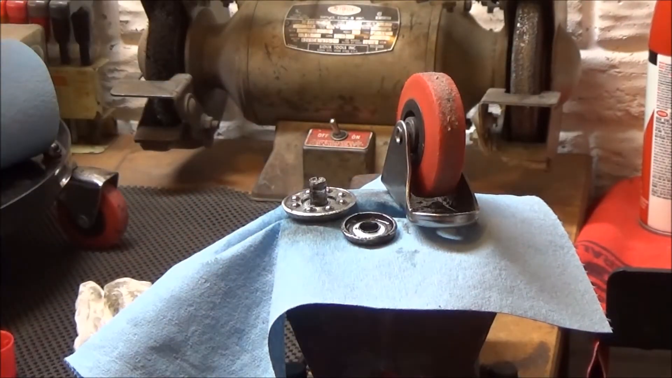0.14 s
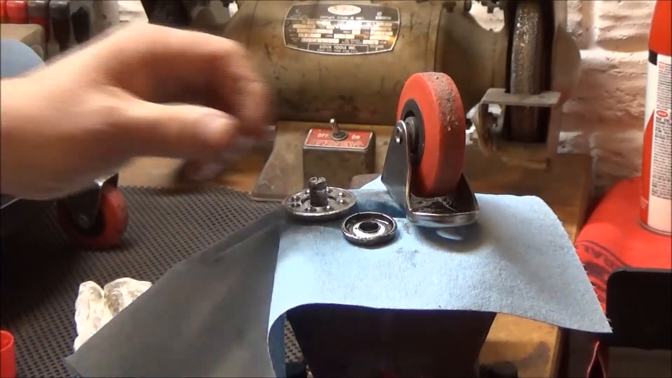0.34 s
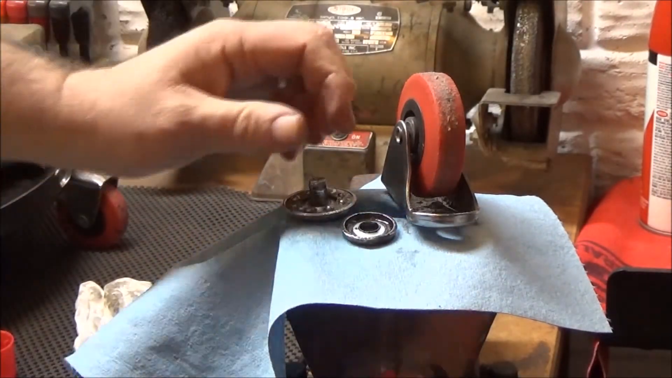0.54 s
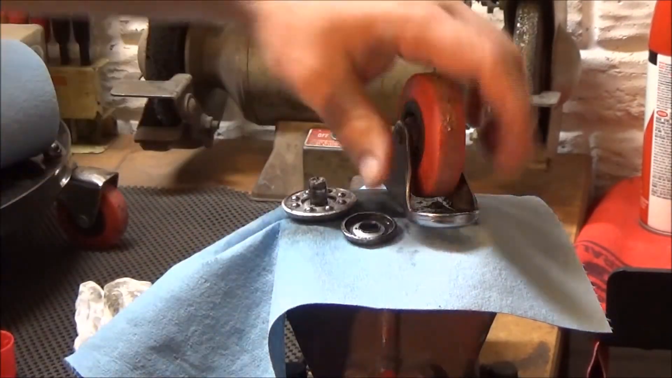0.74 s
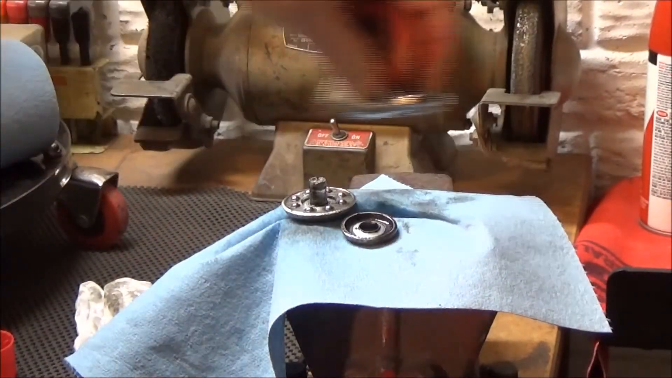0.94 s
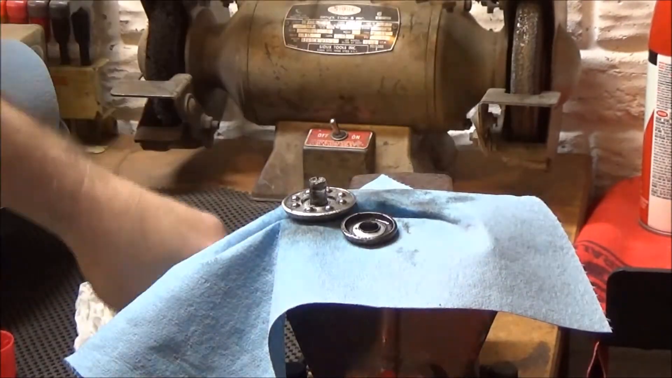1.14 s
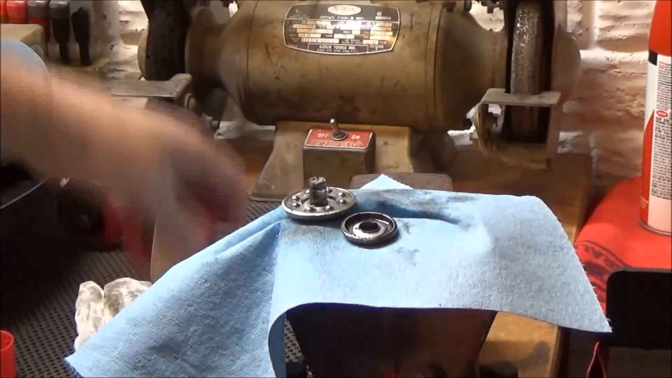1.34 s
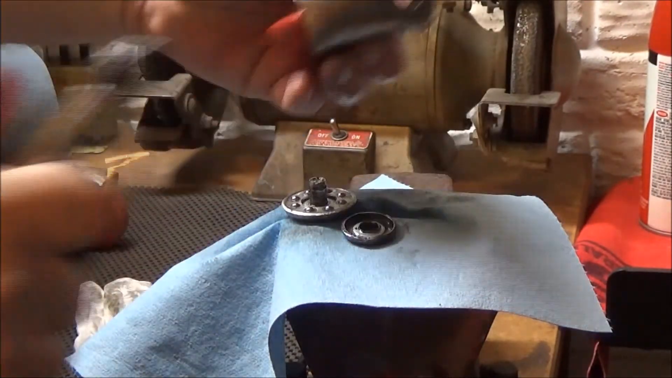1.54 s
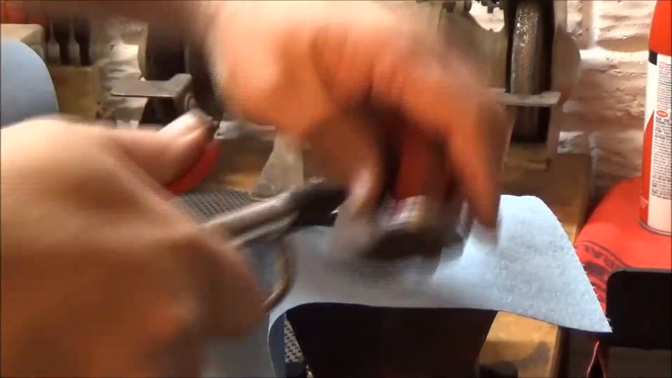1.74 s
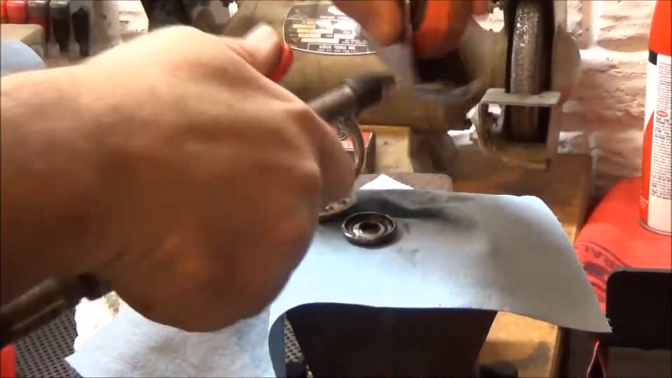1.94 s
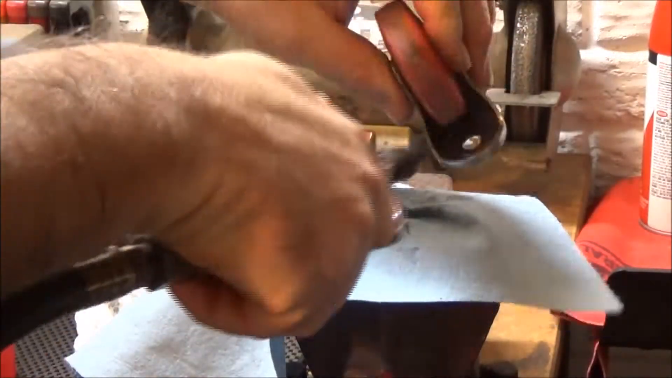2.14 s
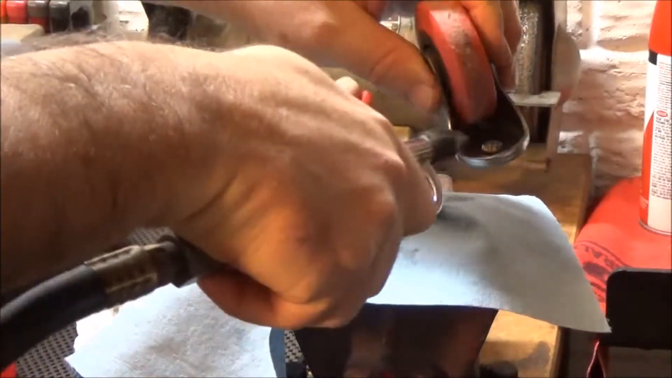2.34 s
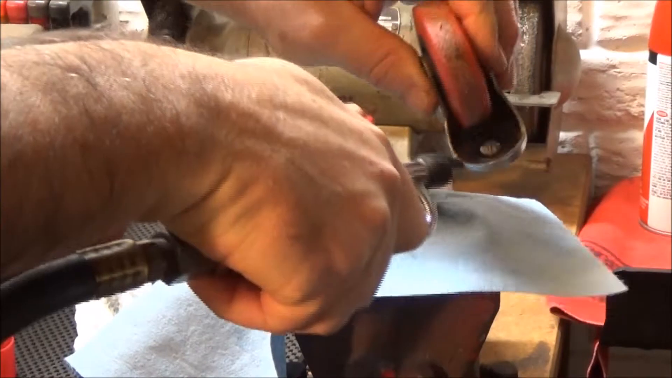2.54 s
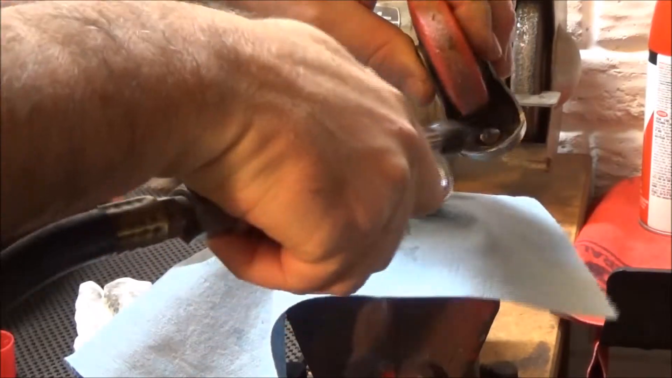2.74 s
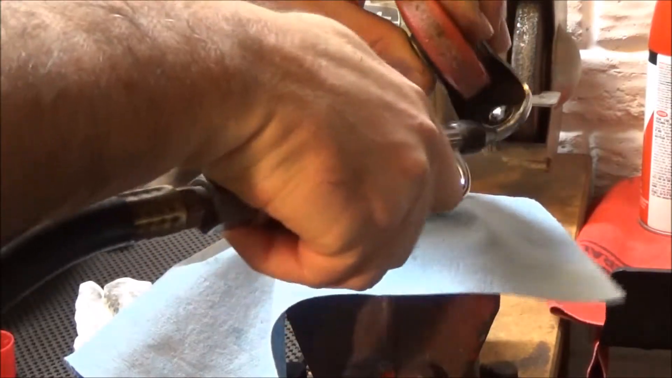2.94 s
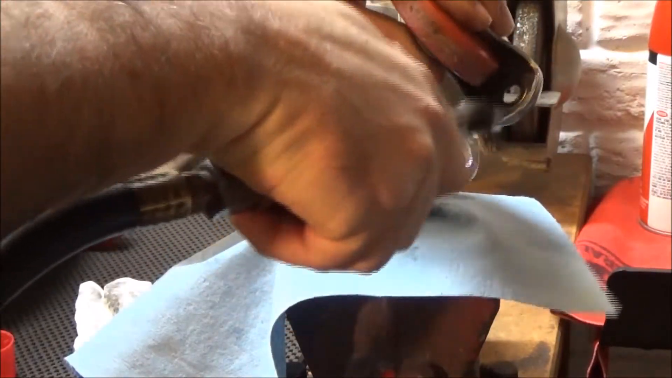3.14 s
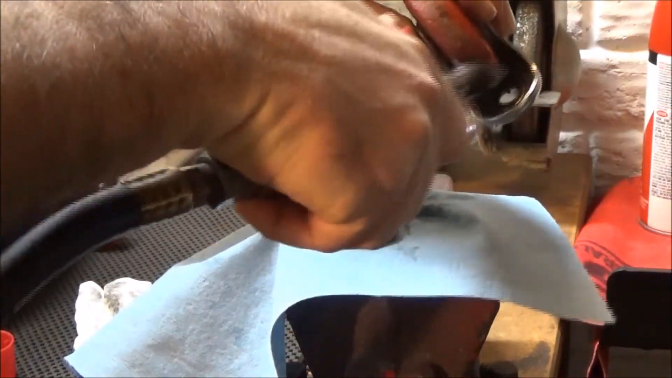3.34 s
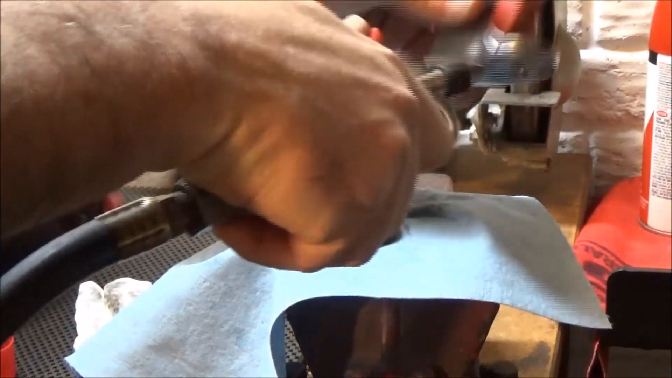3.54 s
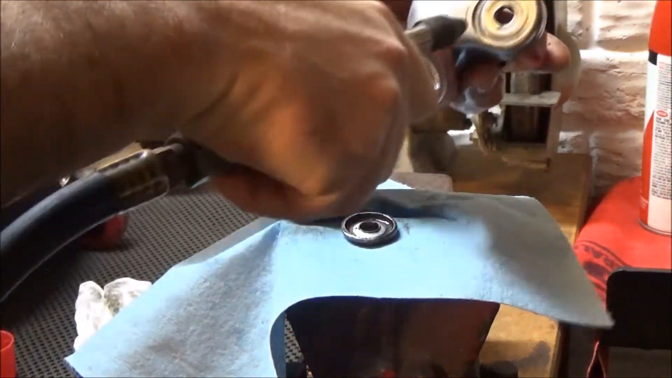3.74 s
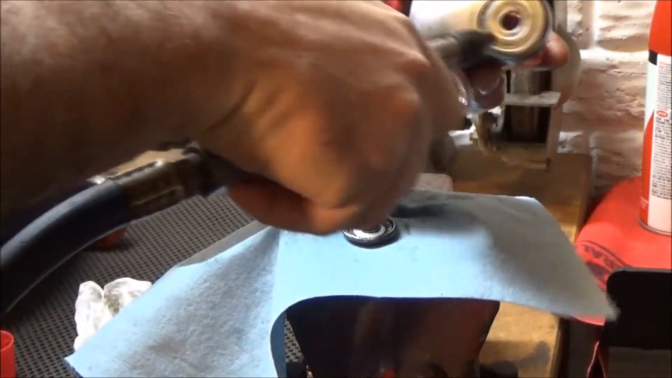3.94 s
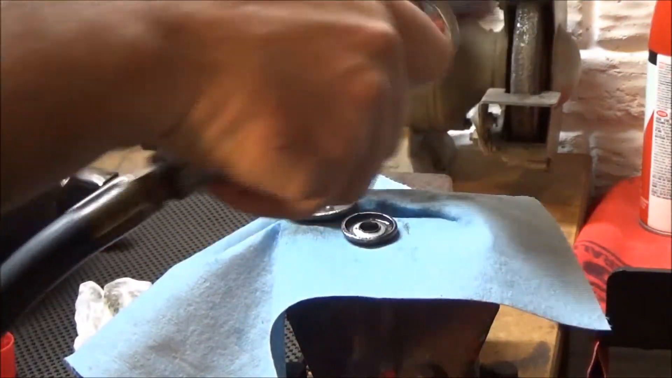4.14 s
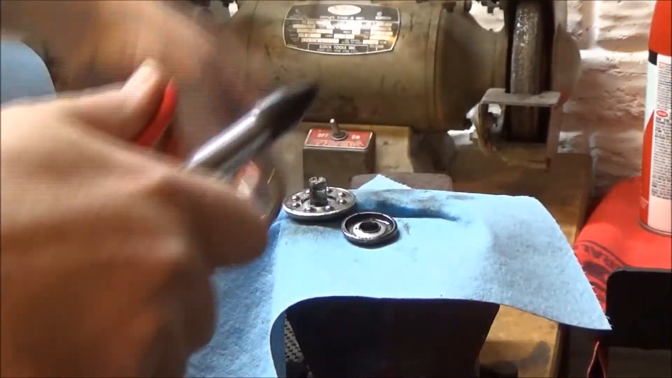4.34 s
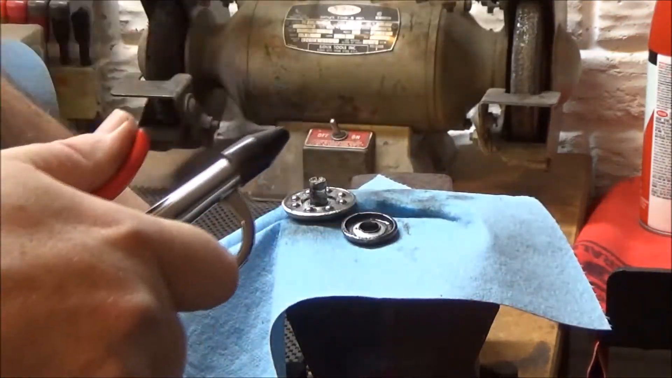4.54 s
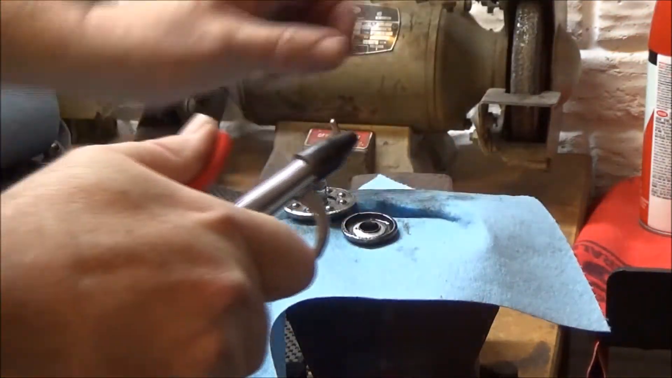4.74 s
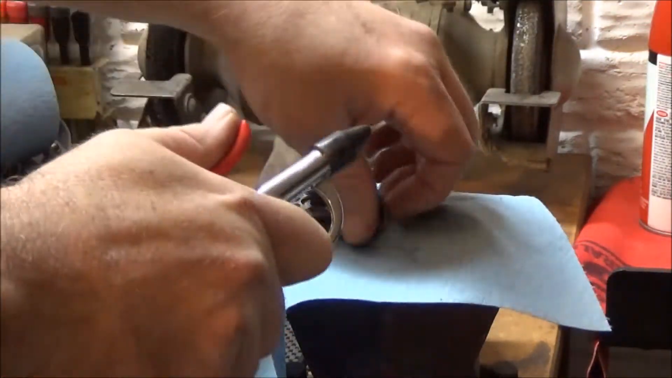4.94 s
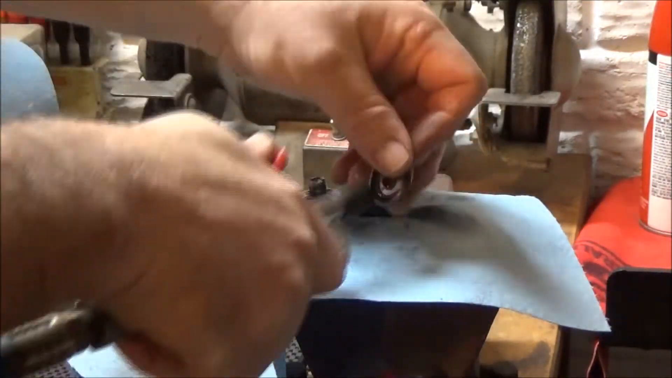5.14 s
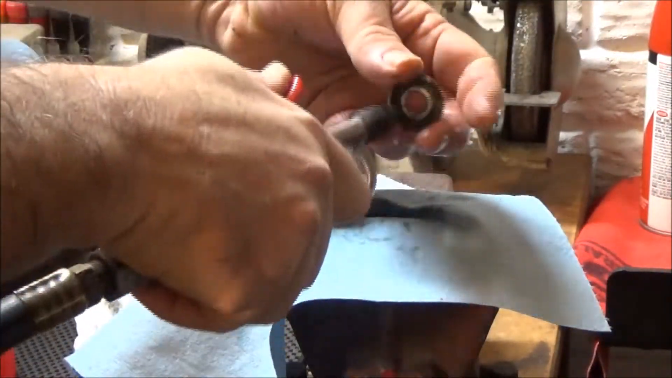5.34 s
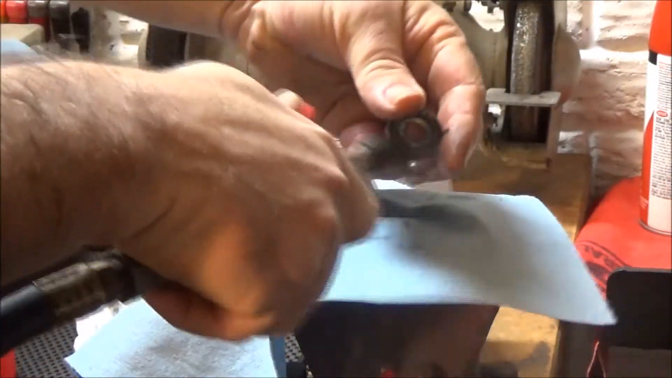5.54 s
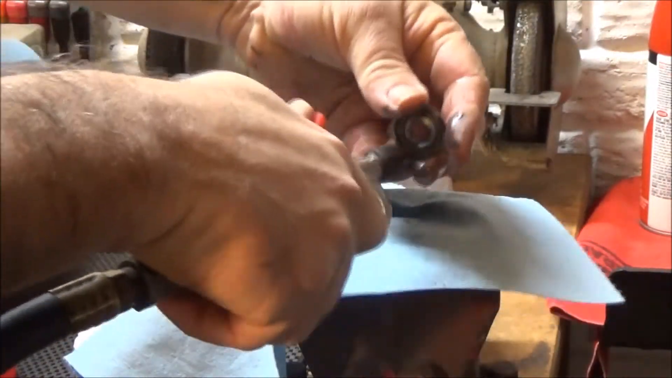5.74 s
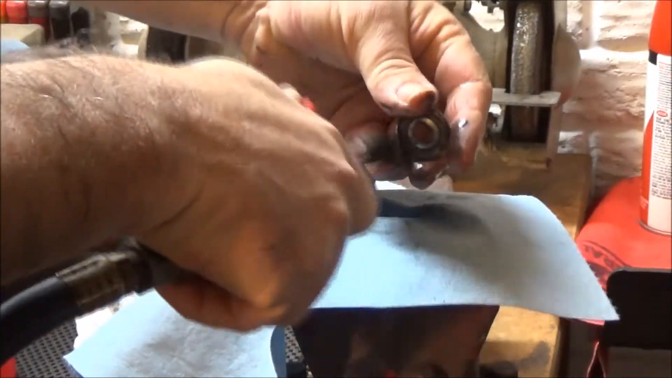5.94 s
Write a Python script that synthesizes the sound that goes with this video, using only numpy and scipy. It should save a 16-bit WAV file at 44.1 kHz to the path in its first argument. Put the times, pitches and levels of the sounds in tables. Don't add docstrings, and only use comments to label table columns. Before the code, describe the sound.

In a small workshop, a motor hums and whines, a metal tool clicks, then compressed air hisses harshly in several abrupt bursts.

```python
import sys
import numpy as np
from scipy import signal
from scipy.fft import rfft, irfft
from scipy.io import wavfile
from scipy.ndimage import uniform_filter1d

SR = 44100
rng = np.random.default_rng(int(sys.argv[2]) if len(sys.argv) > 2 else 0)


def volts_from_db(level):
    exponent = np.asarray(level, float) / 20
    return 10 ** exponent


def pcm_store(signal):
    levels = np.round(np.clip(np.atleast_2d(signal), -1, 1) * 32767)
    wavfile.write(sys.argv[1], SR, levels.astype(np.int16).T)


N = 269010

# opens_s, opening_time_s, starts_to_shut_s, shutting_time_s, nozzle_hiss_db
BLASTS = [
    (2.142, 0.0056, 2.294, 0.026, -18.5),
    (2.468, 0.073, 3.466, .012, -20),
    (3.748, 0.0084, 3.827, .014, -21),
    (3.885, 0.026, 4.096, 0.016, -21),
    (5.497, 0.017, 6.27, .01, -20.5),
]
SLOW_END_S = 0.163
RACE_FROM_S = 5
TOP_HZ = 15750


def rms_one(x):
    return x / np.sqrt(np.mean(x ** 2) + 1e-20)


def at_hz(points, hz):
    table = np.array(points)
    return np.interp(np.log(hz + 0.00087), np.log(table[:, 0]), table[:, 1])


def drift(rate):
    r = np.exp(-32 * np.pi * rate / SR)
    draws = rng.standard_normal(N // 16 + 4002)
    slow = signal.lfilter([1], [1, -2 * r, r * r], draws)[4000:]
    return np.interp(np.arange(N) / 16, np.arange(len(slow)), rms_one(slow))


def stereo_noise(spectrum, likeness):
    hz = np.fft.rfftfreq(N, 1 / SR)
    colour = volts_from_db(at_hz(spectrum, hz)) * (hz < TOP_HZ)
    mid, side = rfft(rng.standard_normal((2, N))) * colour
    alike = np.clip(at_hz(likeness, hz), 0, 1)
    both = np.sqrt(1 + alike) * mid + np.sqrt(1 - alike) * side * [[1], [-1]]
    return hz, both / np.sqrt(np.mean(irfft(both, N) ** 2))


def ripple(depth_db, width_hz):
    hz = np.fft.rfftfreq(N, 1 / SR)
    knots = np.arange(450)
    heights = rng.standard_normal(len(knots))
    heights = np.clip(heights - uniform_filter1d(heights, size=7), -1.5, 1.5)
    fine = np.interp(hz / max(width_hz, 50), knots, heights) * np.clip(hz / 3000, 0, 1)
    cepstrum = irfft(depth_db * fine * np.log(10) / 20, N)
    cepstrum[1:N // 2] *= 2
    cepstrum[N // 2 + 1:] = 0
    return np.exp(rfft(cepstrum))


def ring(strikes, hz, t60):
    r, w = volts_from_db(-60 / (max(t60, .002) * SR)), 2 * np.pi * hz / SR
    return signal.lfilter([0, np.sin(w)], [1, -2 * r * np.cos(w), r * r], strikes)


def noise_bursts(events, rise_share):
    out, size = np.zeros(N + SR), SR // 2
    t = np.arange(size) / SR
    for start_s, db, t60, low_hz, high_hz in events:
        band = signal.butter(2, [low_hz, high_hz], "band", fs=SR, output="sos")
        noise = signal.sosfilt(band, rng.standard_normal(size))
        rise = np.minimum(t / (rise_share * t60), 1)
        fade_out = np.minimum((size / SR - t) * 10, 1)
        shape = volts_from_db(db - 60 * t / t60) * rise * fade_out
        out[round(start_s * SR):][:size] += shape * rms_one(noise)
    return out[:N]


def slow_throbs(t):
    first_s, turn_s, length_s = .0225, .0338, .0045
    out = 0
    for k in range(5):
        shape = np.exp(-((t - first_s - k * turn_s) / length_s) ** 2)
        whine_db = -52.5 if k % 2 or k == 0 else -44.5
        whine = volts_from_db(whine_db) * np.sin(2 * np.pi * 3200 * t)
        partner = (k % 2) * volts_from_db(-51.5) * np.sin(2 * np.pi * 2420 * t)
        out = out + shape * (whine + partner)
    return out


def motor(speed, hum_db, whine_db):
    # pitch_hz, level_db, wander_db
    hum_lines = [(58.6, -51, 3.0), (184.8, -47, 3.5), (243.5, -41, -2.5), (544.5, -62.5, 5.5),
                 (887, -52, 0.5), (978, -54.5, -0.5), (1011, -55, 2), (1400, -70, 4)]
    whine_hz, turns_hz, throb_depth = 6560, 59.45, 3.0
    t = np.arange(N) / SR * speed
    hum = 0
    for hz, db, wander_db in hum_lines:
        hum = hum + volts_from_db(db + wander_db * drift(15.3)) * np.sin(2 * np.pi * (hz * t + rng.random()))
    gate = rms_one(np.exp(throb_depth * np.cos(2 * np.pi * (turns_hz * t + 0.083))))
    whine_level = volts_from_db(-53.5 + whine_db + 1.9 * drift(16.0))
    whine = whine_level * gate * np.sin(2 * np.pi * whine_hz * t)
    return np.sqrt(2) * (volts_from_db(hum_db) * hum + whine)


def gain_control():
    # held_db during the blast, after_db once the valve shuts
    ducks = [
        (-23, -17.5),
        (-43, -27),
        (-38, -29.5),
        (-32, -33),
        (-33, -31),
    ]
    creep_db_per_s, ceiling_db, knee_db, smoothing_s = 11, -0.7, 2, .02
    t = np.arange(N) / SR
    gain_db = -11.5 + creep_db_per_s * (t - SLOW_END_S)
    for (opens, opening, shuts, _, _), (held_db, after_db) in zip(BLASTS, ducks):
        recovering_db = after_db + creep_db_per_s * (t - shuts)
        ducked_db = np.where(t < shuts, held_db, recovering_db)
        gain_db = np.where(t > opens + opening, ducked_db, gain_db)
    gain_db = ceiling_db - knee_db * np.logaddexp(0, (ceiling_db - gain_db) / knee_db)
    return uniform_filter1d(gain_db, max(int(smoothing_s * SR), 1), mode="nearest")


def workshop():
    # pitch_hz, level_db per Hz
    air_colour = [(12, -48), (20, -15.5), (59, -13.5), (130, -14.5), (239, -9.5), (344, -11), (794, -17),
                  (965, -16), (1280, -20), (2110, -26), (4480, -28), (6250, -21.5), (7600, -24),
                  (14000, -24.5), (15700, -17)]
    # pitch_hz, level_db per Hz
    slow_colour = [(12, -38), (20, 6), (59, -11), (123, 1.5), (291, -13), (494, -9), (635, -20),
                   (2790, -28.5), (3200, -26), (3480, -29), (15700, -38)]
    # pitch_hz, left-right likeness (0 to 1)
    air_alike = [(60, 1.0), (130, 0.99), (290, 1.0), (640, 0.96), (1410, 0.7), (3100, 0.4), (6820, 0.87),
                 (15000, 0.93)]
    # time_s, level_db
    whine_shading = [(0, -10.5), (.45, -21), (.6, 0), (1.6, -1), (2.1, 2), (4.2, 0), (6.1, 2)]
    t = np.arange(N) / SR
    air = volts_from_db(-39.5) * irfft(stereo_noise(air_colour, air_alike)[1] * ripple(2.8, 160), N)
    treble = signal.butter(2, 4000, "high", fs=SR, output="sos")
    upper_air = signal.sosfilt(treble, air)
    air = air + (volts_from_db(0.5 * drift(1.3)) - 1) * upper_air
    running = motor(0.98, 0, np.interp(t, *np.transpose(whine_shading)))
    normal = volts_from_db(gain_control()) * (air + running)
    slow = volts_from_db(-41.5) * irfft(stereo_noise(slow_colour, air_alike)[1] * ripple(2.5, 90), N)
    slow = slow + motor(.5, hum_db=-4.5, whine_db=-60)
    early = t[:round(SLOW_END_S * SR)]
    normal[:, :len(early)] = slow[:, :len(early)] + slow_throbs(early)
    return normal


def puffs():
    # start_s, level_db rms, t60_s, low_hz, high_hz
    puff_events = [(0.163, -30, .07, 13000, 15700), (0.164, -41, .06, 5000, 13000),
                   (1.521, -40, .04, 900, 1800), (1.522, -30, .04, 4500, 6000),
                   (1.747, -38, .04, 900, 2000), (1.818, -38, .03, 1500, 8000),
                   (1.912, -38, .04, 1800, 6000), (3.668, -66, .08, 5500, 11000),
                   (4.571, -55, .15, 1100, 1700), (4.572, -58, .08, 4500, 5500),
                   (4.655, -59, .12, 700, 1700), (4.656, -53, .1, 4400, 5300),
                   (4.684, -56, .08, 4400, 5300), (5.185, -66, .06, 1550, 1900)]
    return noise_bursts(puff_events, rise_share=0.014)


def rustles():
    # start_s, level_db rms, t60_s, low_hz, high_hz
    rustle_events = [
        (0.2, -55, .8, 1800, 4500),
        (0.519, -38, .12, 500, 9000),
        (0.75, -56, 4.0, 8000, 9600),
        (0.95, -54, 4.0, 13300, 14800),
        (1.12, -53, 2.5, 5200, 9500),
        (1.3, -56, 4.0, 11300, 12300),
        (1.6, -47, 3.0, 2500, 6000),
        (1.82, -52, 3.0, 13500, 15200),
        (5.1, -66, 2.5, 4700, 6000),
        (5.27, -60, 1.1, 35, 100),
    ]
    return noise_bursts(rustle_events, rise_share=0.025)


def contacts(events, modes, crack, crack_t60, modes_db, bounce_s, bounce_db):
    size = 9000
    out, hz = np.zeros(N + size), np.fft.rfftfreq(size, 1 / SR)
    for start_s, db, ring_hz, ring_db, ring_t60 in events:
        noise = rng.standard_normal(size)
        noise[4:7] = 5.5, 1.5, -5
        noise = rms_one(irfft(rfft(noise) * volts_from_db(at_hz(crack, hz)), size))
        tap = np.zeros(size)
        tap[[0, int(bounce_s * SR)]] = 1, volts_from_db(bounce_db)
        body = 0
        for (mode_hz, mode_db, mode_t60), vary_db in zip(modes, rng.normal(0, 3, len(modes))):
            body = body + volts_from_db(mode_db + vary_db) * ring(tap, mode_hz, min(mode_t60, .045))
        dying = signal.lfilter([1], [1, -volts_from_db(-60 / (crack_t60 * SR))], tap)
        strong_ring = volts_from_db(ring_db) * ring(tap, ring_hz, ring_t60)
        hit = 0.53 * noise * dying + volts_from_db(modes_db) * body + strong_ring
        out[round(start_s * SR):][:size] += volts_from_db(db) * hit
    return out[:N]


def gun_clicks():
    # start_s, peak_db, ring_hz, ring_db relative, ring_t60_s
    gun_events = [
        (1.5212, -16.5, 5670, -3, 0.0078),
        (1.6294, -34.5, 6450, -21, 0.014),
        (1.7469, -10.5, 9050, -20, 0.02),
    ]
    # pitch_hz, level_db, t60_s
    gun_modes = [(5000, 4.5, 0.012), (6385, -19.5, 5.0), (7770, -6.5, 0.068), (7450, -13, 0.18),
                 (9292, -9, 0.087), (13200, 2, 0.08), (15640, -16, 0.099)]
    # pitch_hz, level_db per Hz
    gun_crack = [(530, -54), (900, -20), (4270, -8.5), (4650, -6.5), (6010, -12.5), (8150, 0),
                 (12300, -18.5), (13400, -5), (16500, -26.5)]
    return contacts(gun_events, gun_modes, gun_crack, crack_t60=0.026,
                    modes_db=-18.0, bounce_s=.0025, bounce_db=-12.5)


def part_clicks():
    # start_s, peak_db, ring_hz, ring_db relative, ring_t60_s
    part_events = [
        (4.3151, -55, 5600, -8, .04),
        (4.5705, -36.5, 13700, -5, .07),
        (4.6539, -32.5, 8280, 0, 0.022),
        (4.6828, -36, 8950, -2.5, 0.035),
        (4.701, -43, 4620, -15, .02),
    ]
    # pitch_hz, level_db, t60_s
    part_modes = [(4900, -29.5, 0.084), (8134, -33, 5.0), (8829, -9.5, 0.0095), (9100, -19, 0.039),
                  (11250, -24, 0.045), (13680, -17, 0.055), (14150, -17, 0.042), (15480, -38.5, 0.27)]
    # pitch_hz, level_db per Hz
    part_crack = [(590, -31.5), (1000, -12), (4130, -19), (4820, -8.5), (7010, -7), (8760, -3.5),
                  (12200, -17), (15000, 0), (16500, -17)]
    return contacts(part_events, part_modes, part_crack, crack_t60=0.012,
                    modes_db=-7.0, bounce_s=.0026, bounce_db=1.0)


def shop_echo(x):
    t60_s, echo_db = 0.087, -9.5
    t = np.arange(int(.4 * SR)) / SR
    mid, side = rng.standard_normal((2, len(t))) * volts_from_db(-60 * t / t60_s) * (t > .003)
    tails = np.array([mid + 0.51 * side, mid - 0.45 * side])
    tails = tails / np.sqrt(np.sum(mid ** 2))
    return volts_from_db(echo_db) * signal.fftconvolve(x[None], tails, axes=1)[:, :N]


def valve():
    # time_s, level_db, length_s
    surges = [(2.285, -4, 0.017), (2.555, 2, 0.053), (3.104, 2, 0.0097), (3.204, 4, .015),
              (3.804, 1.5, 0.0148), (3.955, 3, 0.017), (4.002, -0.5, .02), (4.052, 5, .025),
              (5.561, 3.5, 0.054), (5.638, 0, .015), (5.663, 2.5, 0.023), (5.85, 1.5, 0.053),
              (5.957, 1.5, 0.06), (6.038, 5, .012), (6.07, -1.5, 0.005)]
    # buffeting_db, roar_db, sizzle_db
    on_bracket = (-24, -10.5, -5.5)
    # buffeting_db, roar_db, sizzle_db
    on_ring = (-27.5, -11, -9.5)
    # buffeting_db, roar_db, sizzle_db
    in_echo = (-21, -1.5, 0.1)
    opening_power, shut_drop_db, tail_db_per_s = 2.1, 16.5, 321
    t, power, echo = np.arange(N // 16 + 1) * 16 / SR, 1e-12, 0
    surge_db = sum(db * np.exp(-((t - s) / length) ** 2) for s, db, length in surges)
    for opens, opening, shuts, shutting, hiss_db in BLASTS:
        flow = np.clip((t - opens) / opening, 1e-4, 1) ** opening_power
        shut = np.clip((t - shuts) / shutting, 0, 1)
        since = np.maximum(t - shuts - shutting, 0)
        far_walls_db = -23 - 100 * since
        tail_db = np.maximum(-tail_db_per_s * since, far_walls_db)
        level_db = hiss_db + surge_db - shut_drop_db * shut + tail_db
        aimed = np.append(on_bracket if opens < RACE_FROM_S else on_ring, 0)[:, None]
        colour_db = aimed + shut * (np.append(in_echo, 0)[:, None] - aimed)
        power = power + (t > opens) * (flow * volts_from_db(level_db + colour_db)) ** 2
        echo = np.where(t > opens + opening / 2, shut, echo)
    times = np.arange(N) / SR
    levels = np.array([np.interp(times, t, curve) for curve in 10 * np.log10(power)])
    return levels, np.interp(times, t, echo)


def blow_gun(shared_db, own_db, gust_db):
    # pitch_hz, level_db per Hz
    jet_colour = [(30, -39.5), (200, -32), (500, -27), (2000, -21.5), (4000, -17.5), (5500, -18.5),
                  (8000, -11), (10500, -6), (12500, -3.5), (14500, 4), (15700, 4)]
    # pitch_hz, left-right likeness (0 to 1)
    jet_alike = [(200, .998), (900, 1), (2500, .99), (5000, 0.96), (9000, 0.96), (15000, 0.99)]
    echo_width_db, echo_calm = 9.5, 0.27
    levels, echo = valve()
    hz, both = stereo_noise(jet_colour, jet_alike)
    ranges = [(700, 2500), (4000, 8000), (9000, 12300), (12800, 15700)]   # buffeting, roar, sizzle, hiss in Hz
    power = np.mean(np.abs(both) ** 2, axis=0) * 2 / N ** 2
    levels -= np.array([[10 * np.log10(power[(hz > a) & (hz < b)].sum())] for a, b in ranges])
    place = np.clip(2 * np.log2(np.maximum(hz, 1) / 115), 0, 14)
    flutter, out = shared_db * drift(33) + gust_db * drift(160), 0
    for k in range(15):
        band = irfft(both * np.clip(1 - np.abs(place - k), 0, 1), N)
        share = np.interp(k, [7, 11.3, 13, 14], [0, 1, 2, 3])
        low = min(int(share), 2)
        level_db = levels[low] + (share - low) * (levels[low + 1] - levels[low])
        flutter_db = (1 - echo_calm * echo) * (flutter + own_db * drift(33))
        out = out + band * volts_from_db(level_db + flutter_db)
    mid = (out[0] + out[1]) / 2
    side = (out[0] - out[1]) / 2 * volts_from_db(echo_width_db * echo)
    return np.array([mid + side, mid - side])


def edge_flares():
    # start_s, level_db rms, t60_s, low_hz, high_hz
    flare_events = [(2.149, -20, 0.091, 4070, 7060), (2.475, -38, .2, 5540, 13000),
                    (2.545, -20.5, 0.21, 4400, 7260), (2.642, -24, 0.13, 4500, 7000),
                    (2.852, -20.5, 0.097, 6060, 7400), (2.95, -27, 0.73, 5200, 7100),
                    (3.03, -37.5, 0.22, 700, 2800), (3.096, -18.5, 0.11, 4100, 12000),
                    (3.2, -23, 0.14, 5752, 6860), (3.33, -36, 0.33, 506, 2740),
                    (3.425, -42.5, 0.28, 500, 2820), (3.753, -22.5, 0.074, 7100, 7900),
                    (3.93, -26, 0.36, 4250, 8000), (4.04, -44, 0.14, 490.5, 2800),
                    (6.015, -23.5, 0.064, 2680, 5100), (6.05, -18, 0.081, 9000, 12400)]
    return noise_bursts(flare_events, rise_share=0.025)


def hollows(x, peaks):
    out = x
    for hz, width_hz, boost_db in peaks:
        resonance = signal.lfilter(*signal.iirpeak(hz, hz / width_hz, fs=SR), x)
        out = out + (volts_from_db(boost_db) - 1) * resonance
    return out


def reflections(x, depth_db, width_hz, moves_per_s):
    both, mix = rfft(x), np.clip(.5 + 3.1 * drift(moves_per_s), 0, 1)
    first, second = (irfft(both * ripple(depth_db, width_hz), N) for _ in range(2))
    started = np.arange(N) > SR
    return started * (mix * first + (1 - mix) * second)


def jet_on_parts():
    # pitch_hz, width_hz, boost_db
    bracket_hollows = [(4650, 300, 5.0), (5430, 200, 6.5), (6330, 400, 7.5), (6850, 300, 4.5),
                       (9400, 200, 3.5), (11400, 300, 3.5), (12200, 500, 2.0)]
    # pitch_hz, width_hz, boost_db
    race_hollows = [(4500, 320, 4.2), (13700, 510, 2.3)]
    jet = blow_gun(shared_db=0.74, own_db=1.68, gust_db=1.29) + edge_flares()
    swap = RACE_FROM_S * SR
    jet = np.hstack([hollows(jet[:, :swap], bracket_hollows), hollows(jet[:, swap:], race_hollows)])
    jet = reflections(jet, depth_db=4.0, width_hz=70, moves_per_s=14.7)
    return signal.sosfilt(signal.ellip(12, .5, 60, TOP_HZ + 30, fs=SR, output="sos"), jet)


def steel_bracket(jet):
    # pitch_hz, level_db, t60_s
    bracket_modes = [(2350, -70, .85), (2800, -68.5, .85)]
    push = jet[0] * (np.arange(N) < RACE_FROM_S * SR)
    return sum(volts_from_db(db) * ring(push, hz, t60) for hz, db, t60 in bracket_modes)


def scene():
    handling = gun_clicks() + part_clicks() + puffs() + rustles()
    handling = signal.sosfilt(signal.cheby2(10, 50, 16600, fs=SR, output="sos"), handling)
    jet = jet_on_parts()
    return volts_from_db(-2.0) * jet + steel_bracket(jet) + handling + shop_echo(handling) + workshop()


def roll_off(x):
    return signal.sosfilt(signal.butter(12, 17100, fs=SR, output="sos"), x)


def record(dry):
    mid, side = (dry[0] + dry[1]) / 2, (dry[0] - dry[1]) / 2
    side = volts_from_db(2.0) * signal.sosfilt(signal.butter(2, 180, "high", fs=SR, output="sos"), side)
    return roll_off(np.array([mid + side, mid - side]))


dry = scene()
out = record(dry)
pcm_store(out)
```